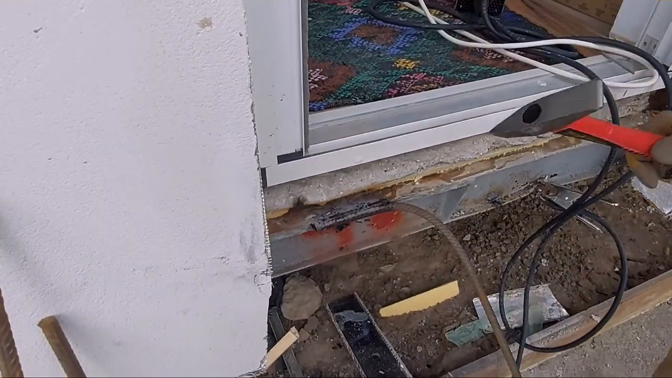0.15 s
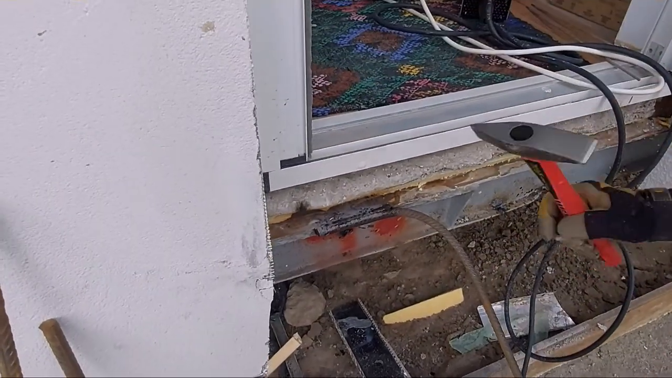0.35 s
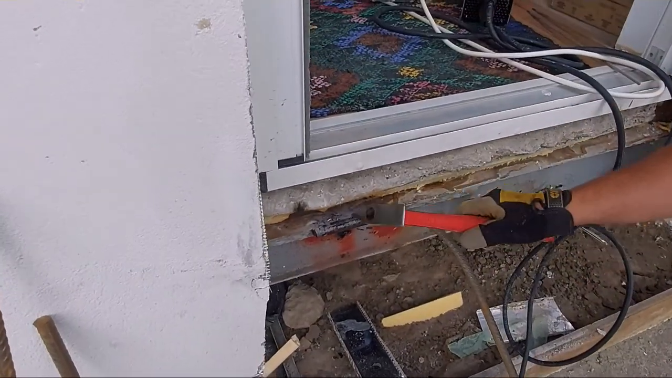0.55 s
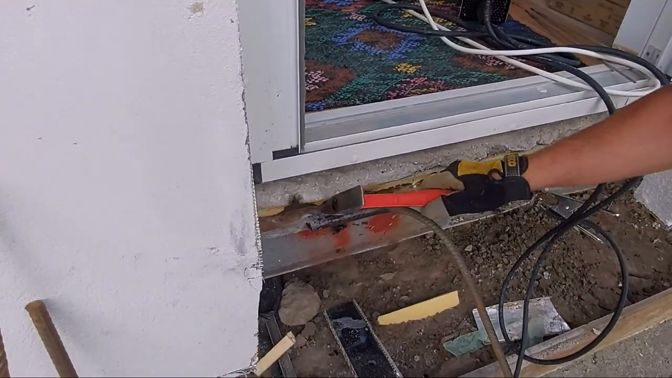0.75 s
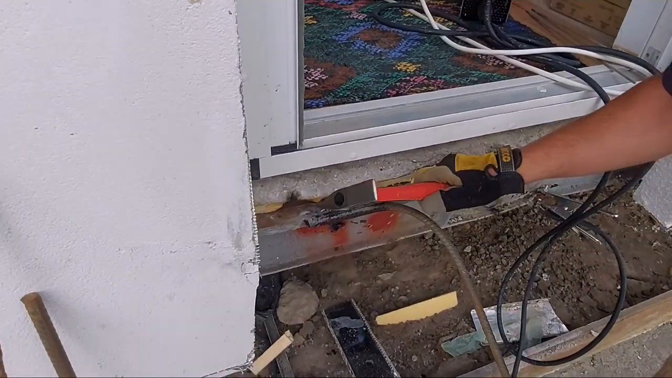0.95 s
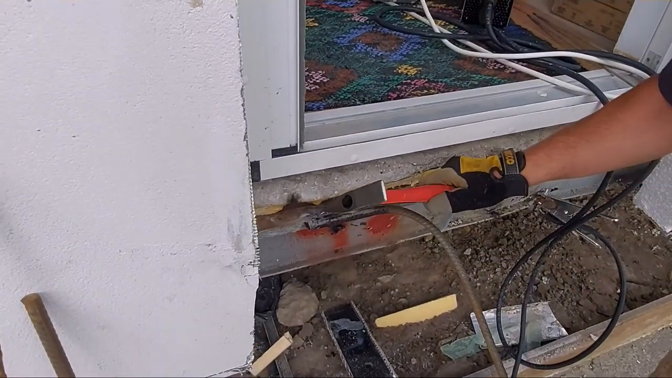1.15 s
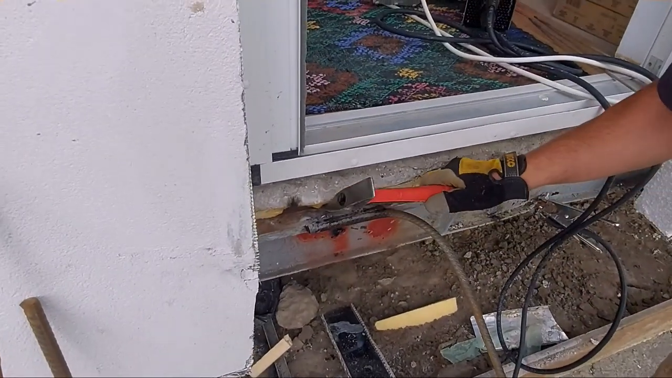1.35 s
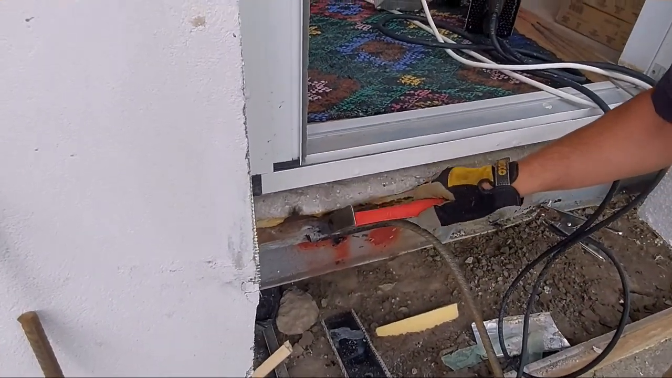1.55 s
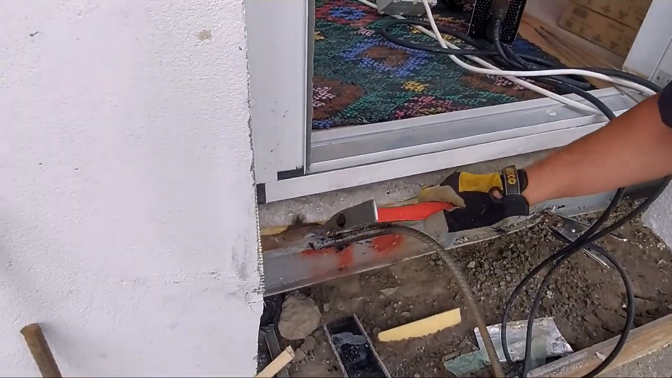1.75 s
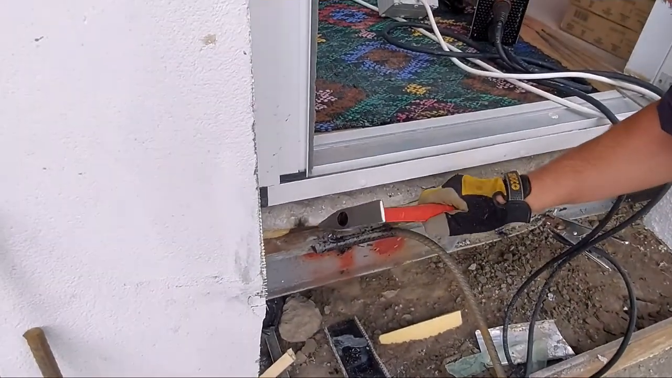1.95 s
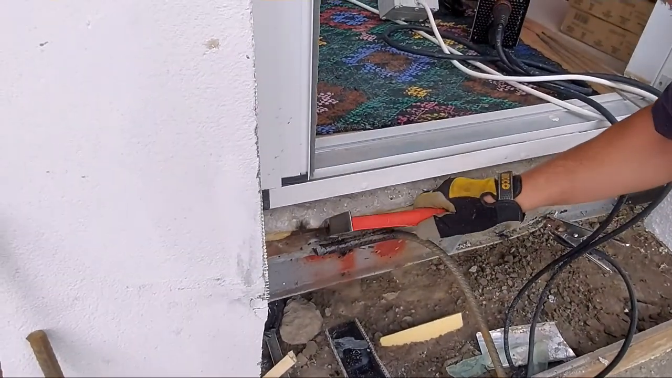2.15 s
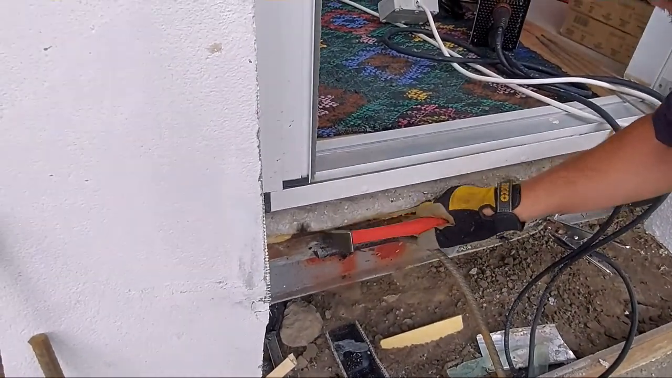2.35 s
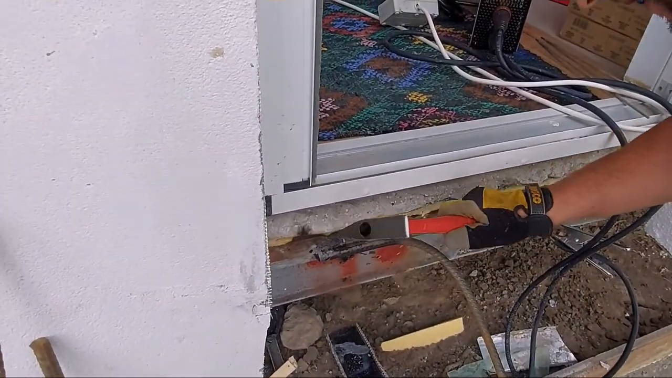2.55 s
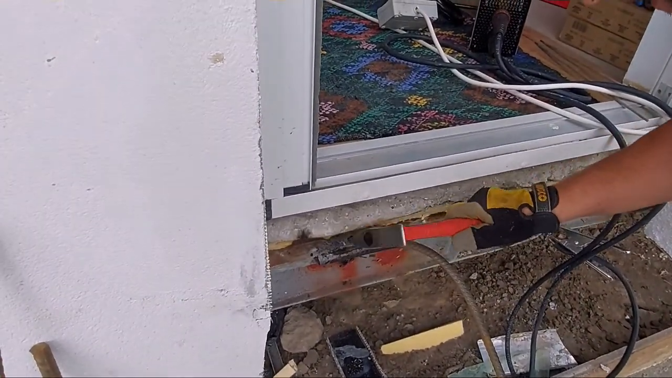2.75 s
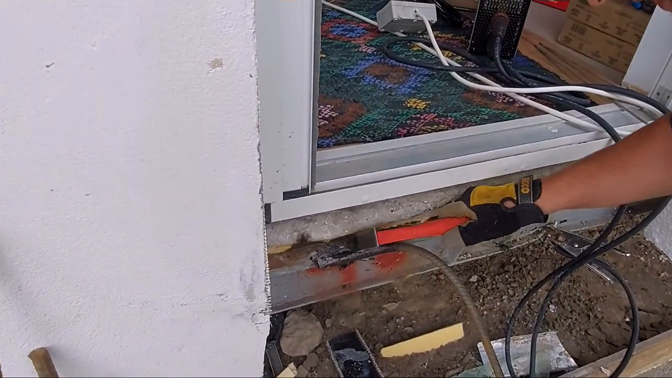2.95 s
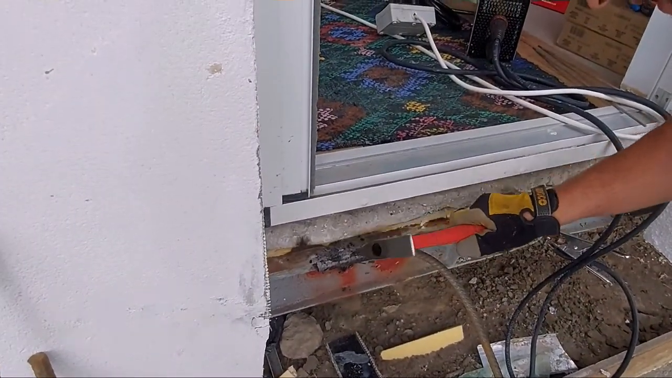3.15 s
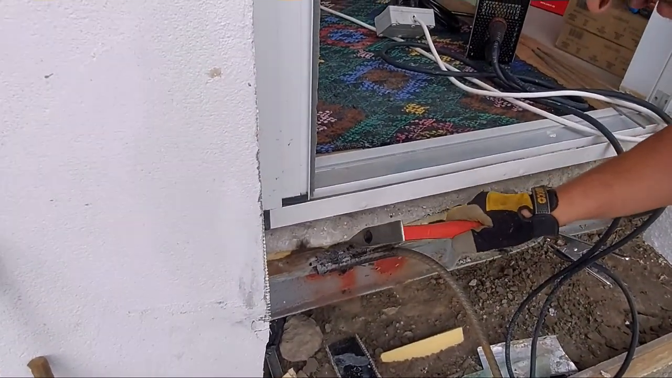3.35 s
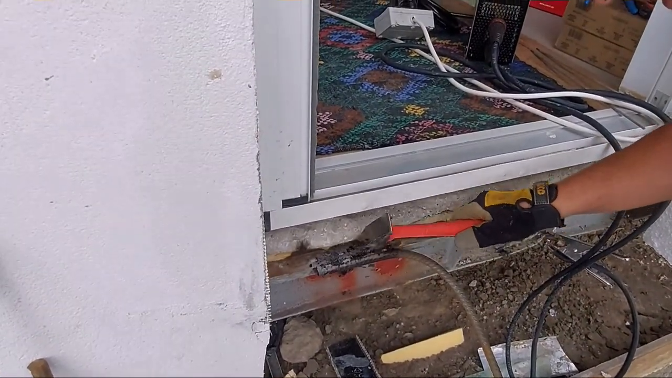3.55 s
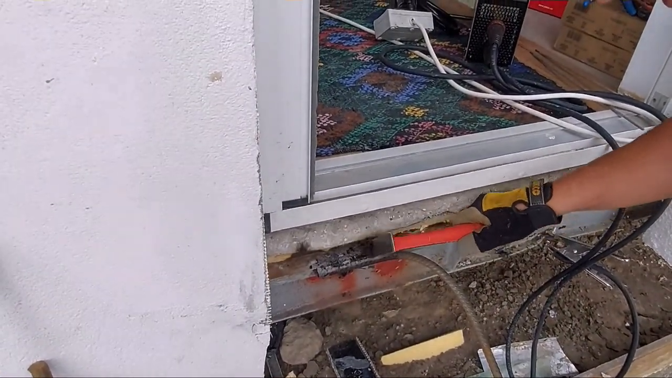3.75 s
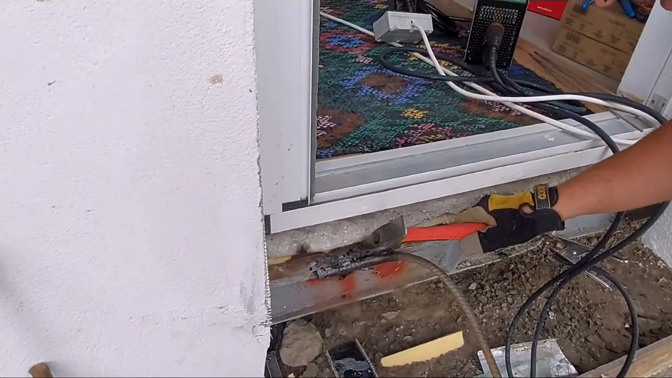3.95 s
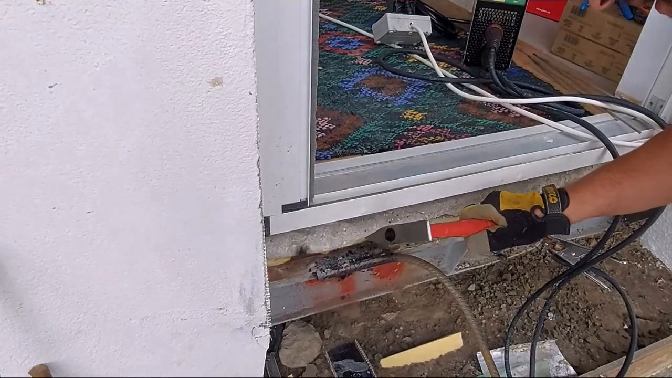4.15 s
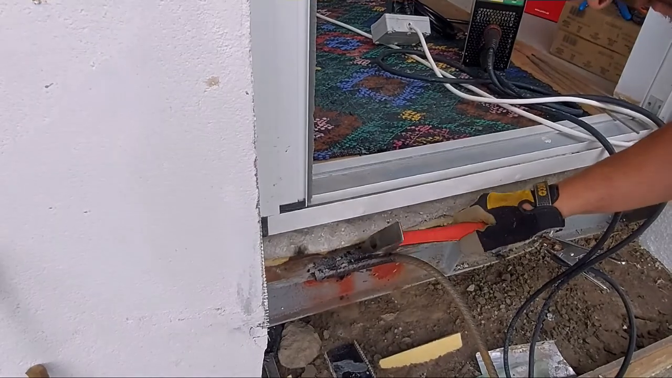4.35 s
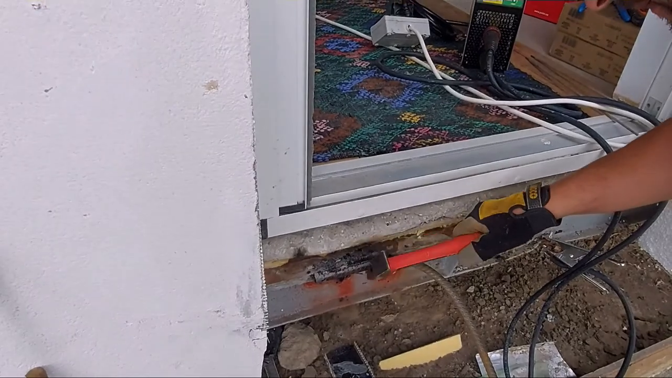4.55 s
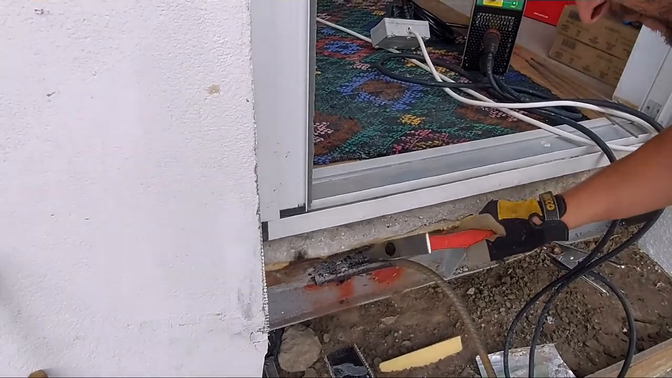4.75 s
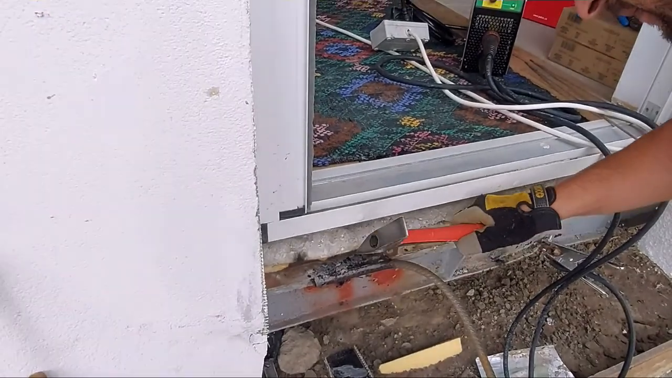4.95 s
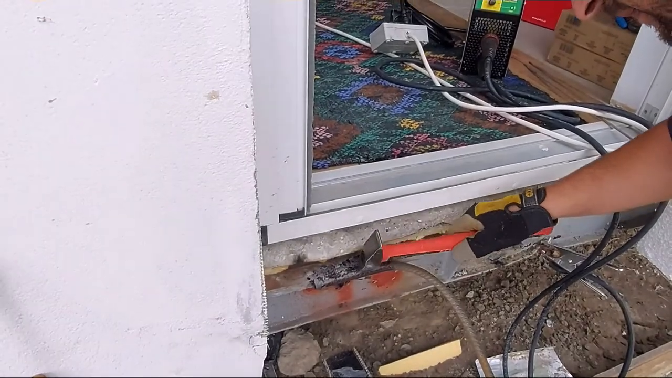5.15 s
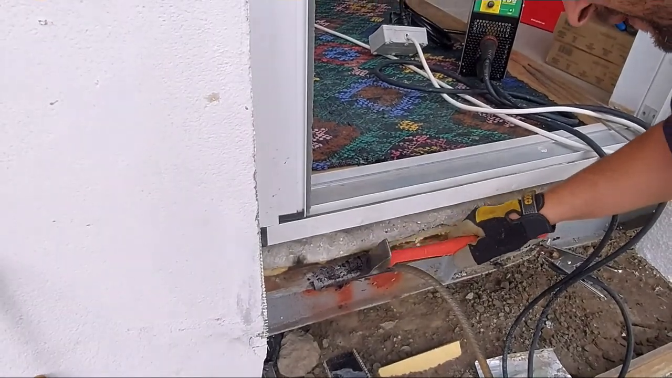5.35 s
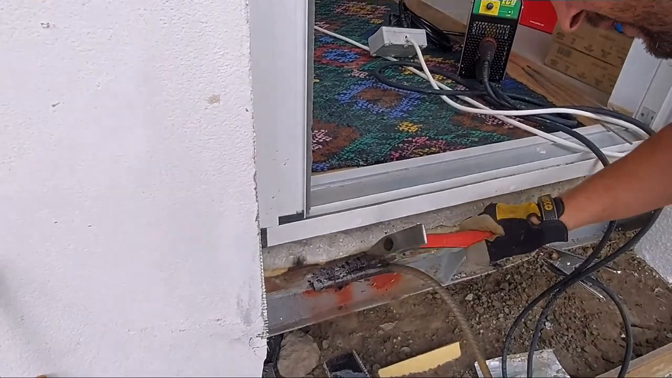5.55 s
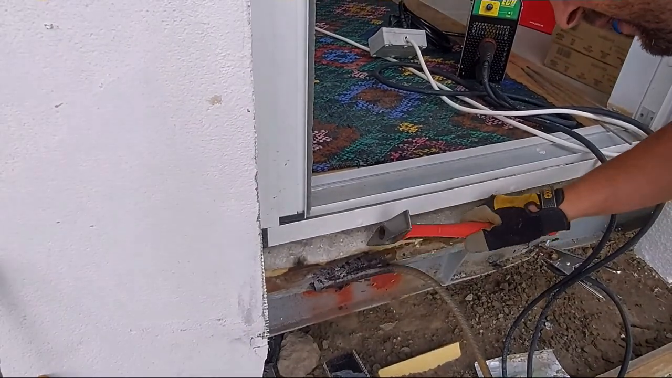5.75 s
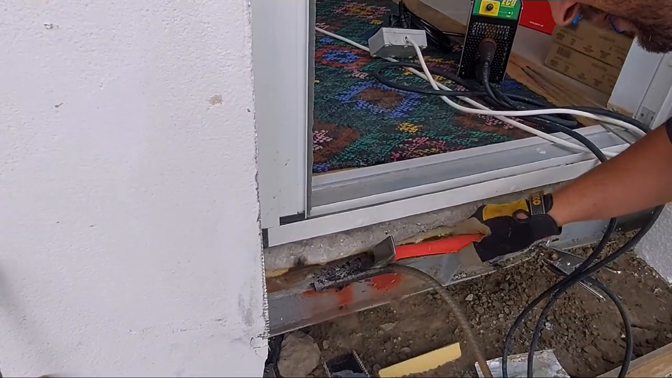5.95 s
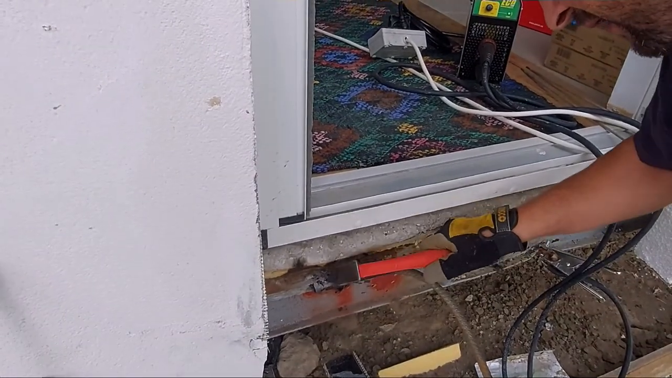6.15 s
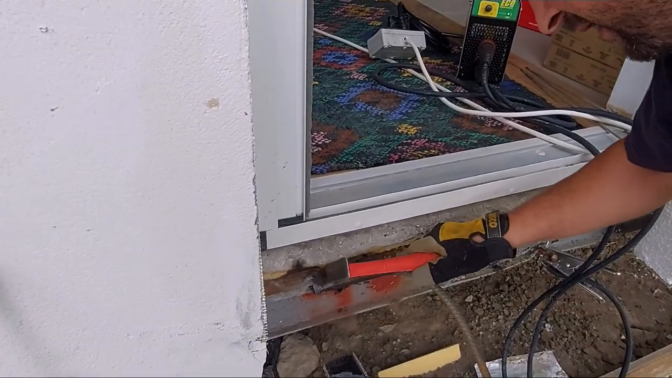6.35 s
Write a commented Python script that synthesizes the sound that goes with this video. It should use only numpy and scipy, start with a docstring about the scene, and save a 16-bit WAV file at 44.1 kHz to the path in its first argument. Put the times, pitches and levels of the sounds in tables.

```python
"""A fan whines indoors over steady wind noise, heard through an open doorway, while a glove and sleeve rustle.
Then a hammer chips slag off a weld on a steel beam, nearly four taps a second.
Each blow sends a falling bending wave along the beam, which returns once from its end;
the steel rings as sines and shaped noise, the room answers, and some blows bounce.
Slag chips patter down as short hisses, and the recorder turns down at each blow and slowly recovers."""
import sys
import numpy as np
from scipy import signal
from scipy.io import wavfile
from scipy.ndimage import uniform_filter1d

SR = 44100
rng = np.random.default_rng(int(sys.argv[2]) if len(sys.argv) > 2 else 0)


def store_wav(level_fs):
    """Save 16-bit WAV to argv[1]."""
    pcm = np.round(np.clip(np.atleast_2d(level_fs), -1, 1) * 32767)
    wavfile.write(sys.argv[1], SR, pcm.T.astype(np.int16))


N = 286459  # length of the scene in samples

# How alike left and right are in the wind noise and the rustle.
# Each row: frequency in Hz, likeness from -1 to 1.
AIR_LIKENESS = [(60, 0.7), (180, 1), (550, 0.71), (1650, 0.51), (4970, -0.11), (15000, 0.15)]
# How alike left and right are in the noise of the blows and chips.
# Each row: frequency in Hz, likeness from -1 to 1.
BLOW_LIKENESS = [(100, 1), (600, 0.82), (1500, 0.15), (3000, 0.16), (8000, 0.12), (15000, 0)]


def amp(db):
    """Turn decibels into a factor for the wave."""
    return 10 ** (np.asarray(db) / 20)


def evened(x):
    """Scale a sound to an average (RMS) strength of one."""
    return x / np.sqrt(np.mean(x ** 2) + 1e-20)


def read(points, hz):
    """Read a curve between its points, along a logarithmic frequency scale."""
    f, value = np.transpose(points)
    return np.interp(np.log(hz + 1), np.log(f + 1), value)


def add(mix, s, sound):
    """Lay a sound into the mix from second s, cut off at the end."""
    part = mix[:, round(s * SR):][:, :sound.shape[1]]
    part += sound[:, :part.shape[1]]


def noise(count, size, level_db, likeness):
    """Stereo noise from random short-time spectra; level_db(hz, t) shapes it."""
    frames = 4 * count // size + 5
    hz = np.fft.rfftfreq(size, 1 / SR)[:, None]
    t = np.arange(frames) * size / 4 / SR
    a, b, c, d = rng.standard_normal((frames, len(hz), 4)).T
    like = np.clip(read(likeness, hz), -1, 1)
    left, other = a + 1j * b, c + 1j * d
    right = like * left + np.sqrt(1 - like ** 2) * other
    spectra = np.array([left, right]) * amp(level_db(hz, t))
    sound = signal.istft(spectra, nperseg=size, noverlap=3 * size // 4)[1]
    return sound[:, :count] / np.sqrt(size)


def air():
    """Steady wind noise of the fan and yard, with patches of pitch that drift in level."""
    # Tone of the wind noise. Each row: frequency in Hz, relative level in dB per Hz.
    air_tone = [(25, 9.5), (60, -6), (110, -15), (330, 0.5), (520, -10.5), (800, -4.5), (950, -6),
                (1260, -4), (1400, 3), (1640, -8), (2100, -9), (2600, -12.5), (5000, -21), (9000, -29),
                (15700, -35)]
    patches = rng.standard_normal((4 * N // 1024 + 5, 513)).T
    patches = uniform_filter1d(patches, 8, 0)  # neighbouring frequencies drift together
    patches = uniform_filter1d(patches, 12, 1)  # and slowly in time
    patches_db = 1.6 * evened(patches)
    wind = noise(N, 1024, lambda hz, t: read(air_tone, hz) + patches_db, AIR_LIKENESS)
    return amp(-54.5) * evened(wind)


def fan():
    """Blade tones at multiples of one pitch, each wavering a little in level."""
    # Tones of the fan. Each row: multiple of the base pitch, RMS level in dB before the waver.
    tones = [(1, -66), (2, -65.5), (3, -66), (4, -63), (5, -65.5), (6, -74), (7, -87), (8, -75),
             (10, -81.5)]
    base_hz = 558.4
    t, out = np.arange(N) / SR, np.zeros((2, N))
    for multiple, db in tones:
        waver_db = 3.0 * np.interp(t, np.arange(80) / 6, rng.standard_normal(80))  # six points a second
        side_turn = np.array([[0], [0.5 * multiple]])  # the right channel runs ahead, in radians
        phase = 2 * np.pi * (multiple * base_hz * t + rng.random()) + side_turn
        out += np.sqrt(2) * amp(db + waver_db) * np.sin(phase)
    return out


def rustle():
    """Bright, flickering friction of leather and a thin swish of cloth, both as shaped noise."""
    # Glove brushing past. Each row: peak in seconds, level in dB.
    brush_rows = [(0.0, -58), (0.168, -60), (0.218, -56.5), (0.306, -64), (0.364, -57), (0.472, -65)]
    # Sleeve swinging. Each row: peak in seconds, swish level in dB, time scale of the swell in seconds.
    swing_rows = [(0.662, -63.5, 0.15), (1.48, -74.5, 0.18)]
    # Tone of the leather. Each row: frequency in Hz, relative level in dB per Hz.
    rub_tone = [(1500, -59), (3200, -1.5), (6000, -8), (10000, -15.5), (15500, -39)]
    # Tone of the cloth. Each row: frequency in Hz, relative level in dB per Hz.
    swish_tone = [(7000, -12), (10000, -6), (12000, -1), (14000, -8), (15700, -20)]
    rise_s, fall_s, end_s = 0.016, 0.03, 1.6
    quiet_rub_db, brush_swish_db, swing_rub_db = -64.5, -14, -1  # the last two: share of each gesture
    count = round(end_s * SR)
    t = np.arange(count) / SR
    flicker_db = 1.2 * rng.standard_normal(4 * count // 256 + 5)

    brushes, swings = np.zeros(count), np.zeros(count)
    for s, db in brush_rows:
        brushes += amp(db) * np.exp(-abs(t - s) / np.where(t < s, rise_s, fall_s))
    for s, db, length in swing_rows:
        swings += amp(db) / np.cosh((t - s) / length) ** 2

    rub = noise(count, 256, lambda hz, u: read(rub_tone, hz) + flicker_db, AIR_LIKENESS)
    swish = noise(count, 256, lambda hz, u: read(swish_tone, hz), AIR_LIKENESS)
    rub_gain = np.sqrt(amp(quiet_rub_db) ** 2 + brushes ** 2 + (amp(swing_rub_db) * swings) ** 2)
    swish_gain = swings + amp(brush_swish_db) * brushes
    return rub_gain * evened(rub) + swish_gain * evened(swish)


def chip(db, tilt_db, t60):
    """A brittle flake: a scatter of tiny impacts, made as uneven noise that dies away."""
    t = np.arange(SR // 6) / SR
    thin = [(600, -40), (2200, -4), (4000, 0), (15000, 0)]  # too small to radiate bass (Hz, dB)
    tilt_db = np.clip(tilt_db, -6, 6)

    def level_db(hz, u):
        grit_db = 3.0 * rng.standard_normal(len(u))  # the tiny impacts are unequal
        return tilt_db * np.log2(hz / 6000 + 0.067) + read(thin, hz) + grit_db

    hiss = evened(noise(len(t), 128, level_db, BLOW_LIKENESS))
    rise = np.minimum(t / 0.00093, 1)
    return amp(db + 0.5 - 60 * t / t60) * hiss * rise


def bending_wave(start_hz, end_hz, glide, rise, fall, turn):
    """High notes travel faster in a beam, so a blow arrives as a falling chirp (times in seconds)."""
    t = np.arange(1200) / SR
    hz = end_hz + (start_hz - end_hz) * np.exp(-t / glide)
    swell = (1 - np.exp(-(t / rise) ** 2)) * np.exp(-(t / fall) ** 0.73)
    return swell * np.sin(2 * np.pi * (np.cumsum(hz) / SR + turn))


def waves(clean):
    """The first wave along the beam, stronger for a clean contact, and its duller return from the end."""
    out = np.zeros((2, 2000))
    first = clean * amp(9.5) * bending_wave(2427, 538.4, 0.001756, 0.0012, 0.0026, 0.29)
    back = amp(1.5) * bending_wave(820, 594, 0.0024, 0.0053, 0.0033, 0.21)
    add(out, 0, np.array([first, np.roll(first, -1)]))  # right is one sample early
    add(out, .0095, np.array([back, back]))
    return out


def modes(table, t, lift_db, longest):
    """Dying sines; the struck spot scatters their strength and pitch, and the phase of the high ones."""
    out = np.zeros((2, len(t)))
    for (hz, db, t60), draw in zip(table, rng.standard_normal((len(table), 4))):
        gain = amp(db + lift_db(hz) + 2 * draw[0] - 60 * t / min(t60, longest))
        rise_s = 0.0011 + 0.011 / (1 + (hz / 430) ** 6)  # low modes boom late
        gain = gain * (1 - np.exp(-(t / rise_s) ** 2))
        side_turn = np.array([[0], [0.79 * draw[2]]])
        turn = hz / 1500 * (draw[1] + side_turn)
        out += gain * np.sin(2 * np.pi * hz * (1 + 0.013 * draw[3]) * t + turn)
    return out


def blow(s, db, clean, slag_db, ping_db, thud_db, length):
    """Waves, modes of beam and hammer, crunching slag, dense ring of the steel and answer of the room."""
    # Single notes of the beam. Each row: middle pitch in Hz, level in dB before the lifts,
    # seconds to fall 60 dB before the cap.
    beam = [(165.4, -30.5, 0.28), (251.8, -25.5, 0.26), (340.7, -21.5, 0.39), (367, -21, 0.27),
            (432.6, -23, 0.13), (583.6, -11, 0.14), (668.3, -4.5, 0.086), (806, -23, 0.17),
            (888, -11, 0.059), (975, -12.5, 0.12), (1175, -29, 0.24), (1505, -21.5, 0.16),
            (1796, -20, 0.17), (2272, -5.5, 0.041), (2360, -28, .08), (2840, -67, 0.067), (2980, -47, .1),
            (3660, -34, 0.12), (4950, -5, 0.1), (5940, -49, .1), (6620, -3, 0.059), (7020, -15, 0.061),
            (8450, -13, 0.086)]
    # Notes of the hammer head. Each row: middle pitch in Hz, level in dB before the ping of the blow,
    # seconds to fall 60 dB before the cap.
    hammer = [(4223, -23, 0.042), (4500, -28.5, 0.1), (9230, -40.5, 0.089), (12200, -39, 0.099)]
    # Note of the beam's flange. Each row: middle pitch in Hz, level in dB before the lift along the weld,
    # seconds to fall 60 dB before the cap.
    clang = [(2149, 6, 0.06)]
    # Tone of the dense ring and crack. Each row: frequency in Hz, relative level in dB.
    clatter = [(60, -54), (150, -21.5), (300, -9), (600, -3), (1000, -9.5), (2000, -1.5), (3000, 10),
               (6000, 0.5), (10000, -8.5), (15000, -47)]
    # Decay of the dense ring. Each row: frequency in Hz, seconds to fall 60 dB before this blow's factors.
    clatter_t60 = [(100, 0.68), (400, 0.23), (700, 0.21), (1800, 0.11), (5000, 0.1), (9000, 0.11),
                   (13000, 0.051)]
    # Rattling slag holds the treble up before it drops.
    # Each row: frequency in Hz, curve of the decay (above 1 holds, then drops).
    hold = [(500, 0.92), (2000, 1.23), (5000, 1.56), (12000, 0.71)]
    # Answer of the room indoors. Each row: frequency in Hz, relative level in dB.
    hall_tone = [(60, -53), (160, -2.5), (220, -31), (350, -5), (440, -18), (570, 1), (700, -3.5),
                 (850, -20), (1000, -2), (1400, -40), (2000, -5.5), (2700, -25.5), (4300, -28), (8000, -77)]
    # Decay of the room. Each row: frequency in Hz, seconds to fall 60 dB before the closing fade.
    hall_t60 = [(100, 0.87), (500, 2.3), (1500, 0.62), (5000, 0.84)]
    longest_beam, longest_head = .22, .065  # the wall and the grip cap the decays, in seconds
    count = SR // 2
    t = np.arange(count) / SR
    # the clang drops by 10 dB around 4 s, as the hammer works its way along the weld
    clang_db = -16.5 - 10 / (1 + np.exp((4 - s) / 0.12))
    crunch_db, top_db = -24 + slag_db, -24 + slag_db  # at 3.5-5.5 kHz, and from 8 kHz up
    clean_db = -3.5 * (clean - .5)  # a clean contact rings the beam modes less

    def edge(hz):
        """The contact sets the thud below and the crunch above."""
        return read([(250, thud_db), (500, 0.006), (1800, 0),
                     (3500, crunch_db), (5500, crunch_db), (8000, top_db)], hz)

    out = modes(beam, t, lambda hz: edge(hz) - 1.5 + clean_db, longest_beam)
    out += modes(hammer, t, lambda hz: ping_db, longest_head)
    out += modes(clang, t, lambda hz: clang_db, longest_head)
    add(out, 0, waves(clean))

    # a short crack, weaker when the contact is clean
    crack = noise(count, 64, lambda hz, u: read(clatter, hz) + edge(hz), BLOW_LIKENESS)
    out += amp(4.5) * crack * (1.3 - clean) * t / 0.0012 * np.exp(1 - t / 0.0016)

    # steel meets steel
    tick_tone = [(4000, -32), (8000, 6.5), (15500, 1)]  # Hz, dB
    tick = noise(count, 64, lambda hz, u: read(tick_tone, hz), BLOW_LIKENESS)
    out += amp(top_db - 14.5) * tick * t / 0.0013 * np.exp(1 - t / 0.0026)

    # many close modes, unequal in strength and damping
    crowd_db = 3 * rng.standard_normal((257, 1))
    lasting = np.exp(.15 * rng.standard_normal((257, 1)))

    def ring_db(hz, u):
        t60 = length * lasting * read(clatter_t60, hz)
        return read(clatter, hz) + edge(hz) + crowd_db - 60 * (u / t60) ** read(hold, hz)

    ring = noise(count, 512, ring_db, BLOW_LIKENESS)
    out += amp(6.1) * ring * (1 - np.exp(-t / 0.0004))

    hall = noise(count, 1024, lambda hz, u: read(hall_tone, hz) - 60 * u / read(hall_t60, hz), BLOW_LIKENESS)
    hall_fade = np.cos(np.pi * t / (2 * t[-1]))
    out += amp(-10.5) * hall * (1 - np.exp(-t / 0.012)) * hall_fade
    pan_db = -0.53 * np.array([[.5], [-.5]])  # left minus right is -0.53 dB
    return out * amp(db + pan_db)


def scene():
    """Lay the rustle, blows, bounces and chips over the fan and its wind noise."""
    # Hammer blows. Each row: start in seconds, strength in dB, cleanness of the contact from 0 to 1,
    # crunch of the slag in dB, ping of the hammer head in dB, thud in dB, ring length as a factor.
    blows = [(1.637, -1, 0.43, -4, 0, 2, 1.05), (1.906, -2.5, 0.95, 0.5, -18, 2.5, 0.81),
             (2.164, -3.5, 0.48, 1.5, 2.5, -10, 0.97), (2.458, -3.5, 0.36, 1, 7, 0.5, 1.28),
             (2.746, -3, 1, -4, -7, 5, 1.03), (3.026, -2, 0.57, -0.5, 9, 1, 1.06),
             (3.313, -5, 0.66, 2.5, 10.5, -1.5, 1.06), (3.579, -3, 0.49, -2.5, 2.5, 4, 1.07),
             (3.837, 0, 0.55, 0.5, 10, 0.5, 1), (4.092, -2, 0.44, -0.5, 12.5, 0.5, 1.22),
             (4.359, -2.5, 0.93, 0.5, 4, 4, 1.12), (4.617, -1, 0.8, -3, -1, 4.5, 1.43),
             (4.93, -3, 0.32, -2, -2, 6.5, 1.26), (5.192, -1, 0.78, 0, -8, 1.5, 1.42),
             (5.455, 0.5, 0.63, -4, -17, 3, 1.55), (5.739, 0, 0.42, 0, 7.5, -2.5, 1.32),
             (5.983, -1.5, 0.63, 2, 5, 7.5, 1.17), (6.249, -0.5, 0.54, 0.5, -23, 3.5, 1.17),
             (6.491, -1, 0.22, -4, -6, -9, 1.4)]
    # Second contacts of the hammer. Each row: start in seconds, strength in dB.
    bounces = [(2.1665, -19), (2.4685, -1), (3.5815, -6), (3.8405, -20), (4.095, -27), (5.7425, -5),
               (5.988, -28), (6.2515, -14)]
    # Slag chips landing. Each row: start in seconds, level in dB before a small common lift,
    # brightness in dB per octave (held within 6 either way), seconds to fall 60 dB.
    chips = [(2.1256, -39, -11, 0.22), (2.2885, -48, -3, 0.064), (2.5294, -61, 2, 0.16),
             (2.7044, -63, -1, 0.12), (3.4016, -47, -5, 0.12), (3.4996, -43, 1, 0.026),
             (3.9887, -25.5, -5.5, 0.11), (4.0206, -27, -4, 0.037), (4.0533, -29.5, -5, 0.17),
             (4.3023, -33.5, 6, 0.032), (5.1163, -58, -5, 0.08), (5.137, -57, -2, 0.077),
             (5.6466, -57, 4, 0.08)]
    mix = air() + fan()
    add(mix, 0, rustle())
    for row in blows:
        add(mix, row[0], blow(*row))
    for s, db in bounces:
        add(mix, s, amp(db) * waves(0.31))
    for s, db, tilt_db, t60 in chips:
        add(mix, s, chip(db, tilt_db, t60))
    return mix


def record(dry):
    """Bass roll-off; gain control turns down at each blow and recovers slowly; a ceiling; a treble limit."""
    dry = signal.sosfilt(signal.butter(2, 70, "highpass", fs=SR, output="sos"), dry)
    power = uniform_filter1d((dry ** 2).mean(0), 220)  # averaged over 5 ms
    power_db = 10 * np.log10(abs(power) + 1e-12)
    fall_db = np.arange(N) * 5. / SR  # the held peak sinks 5 dB a second
    held_db = np.maximum.accumulate(power_db + fall_db) - fall_db
    over_db = np.clip(held_db + 27.5, 0, None)  # excess above -27.5 dB
    late_db = signal.lfilter([.002], [1, -.998], over_db)  # the control lags about 11 ms
    ducked = np.clip(dry / amp(0.23 * late_db), -1, 1)
    treble_limit = signal.firwin(511, 15730, window=("kaiser", 9), fs=SR)  # cutoff in Hz
    return signal.oaconvolve(ducked, treble_limit[None], "same")


dry = scene()
out = record(dry)
store_wav(out)
```